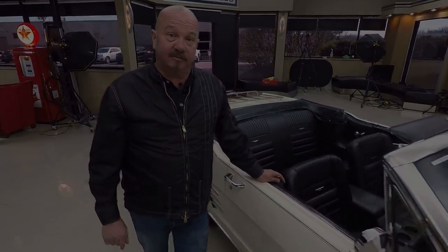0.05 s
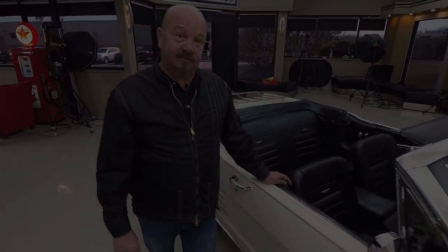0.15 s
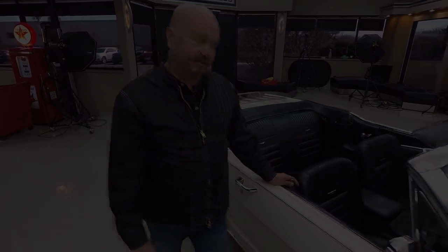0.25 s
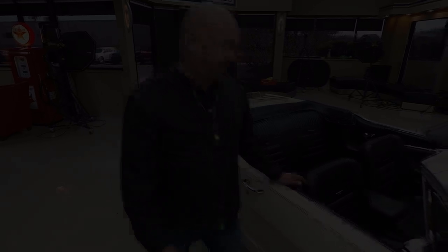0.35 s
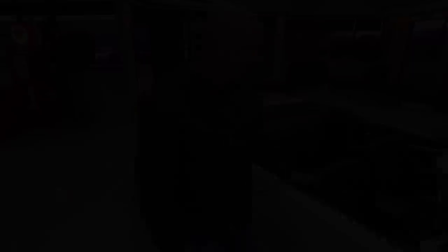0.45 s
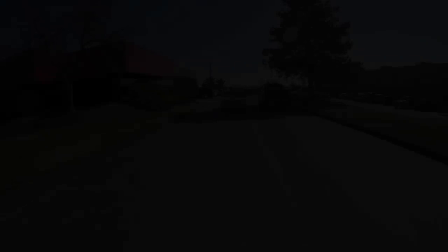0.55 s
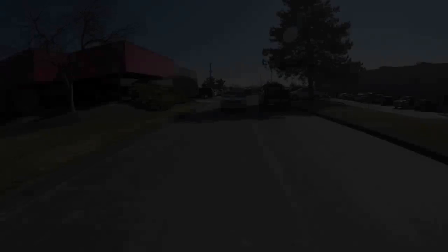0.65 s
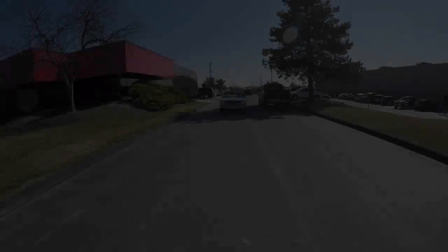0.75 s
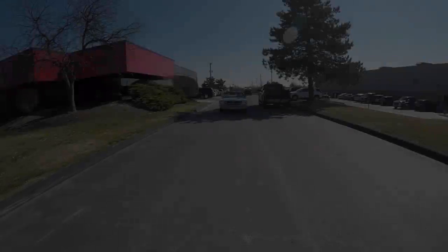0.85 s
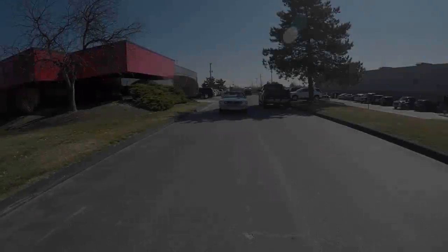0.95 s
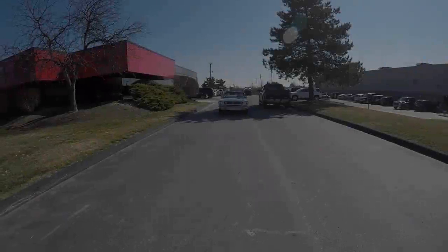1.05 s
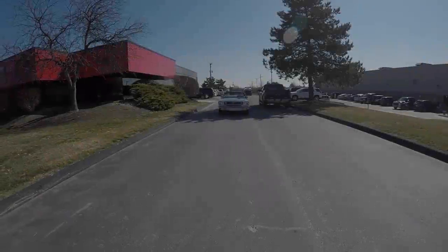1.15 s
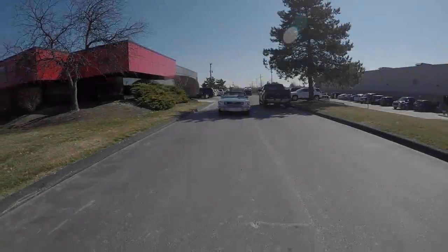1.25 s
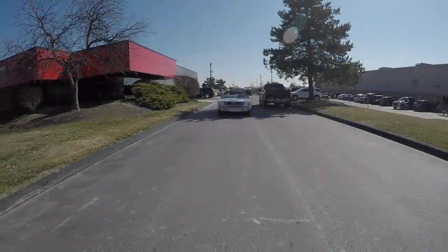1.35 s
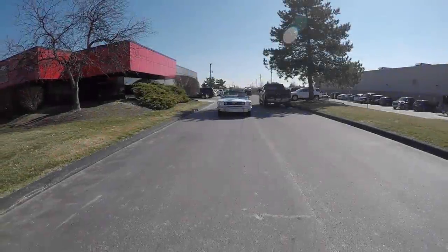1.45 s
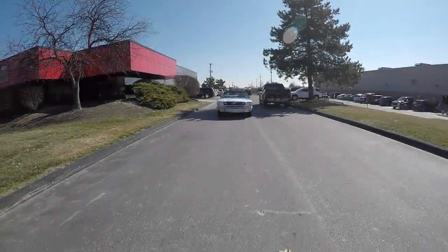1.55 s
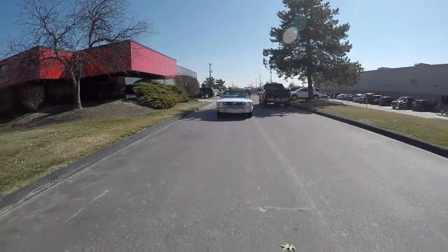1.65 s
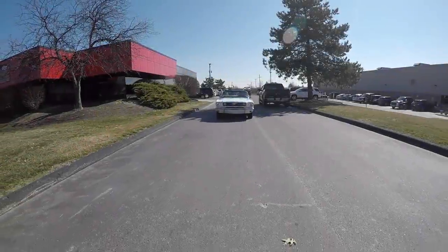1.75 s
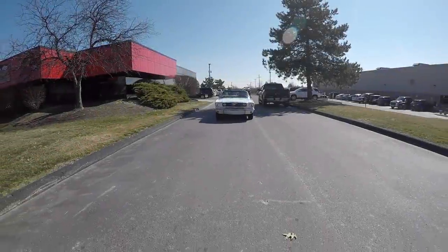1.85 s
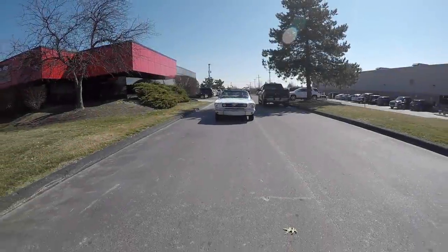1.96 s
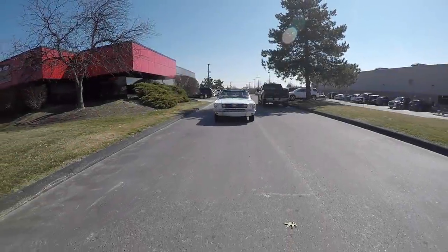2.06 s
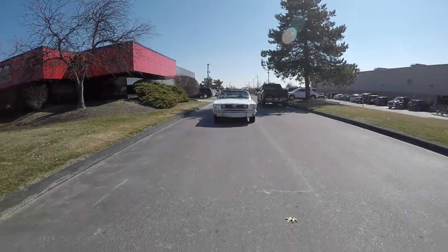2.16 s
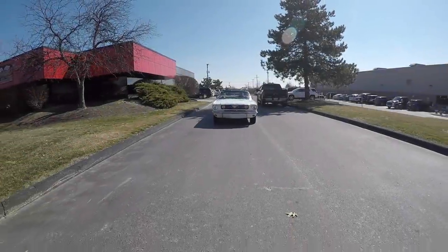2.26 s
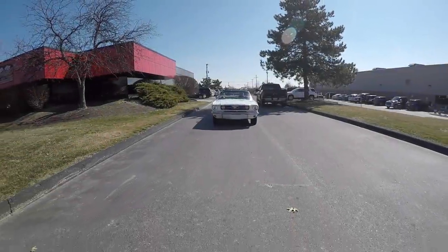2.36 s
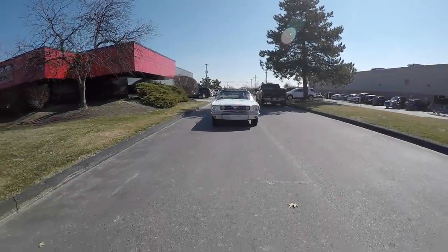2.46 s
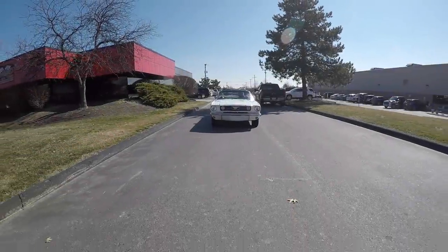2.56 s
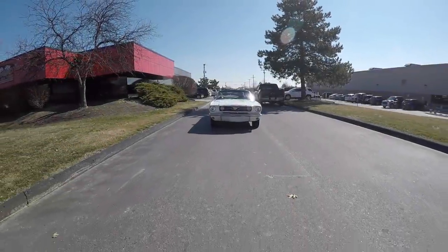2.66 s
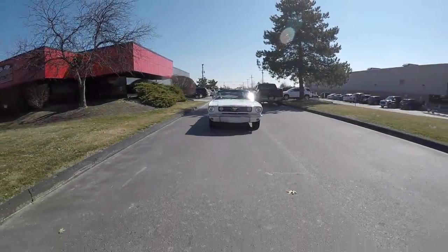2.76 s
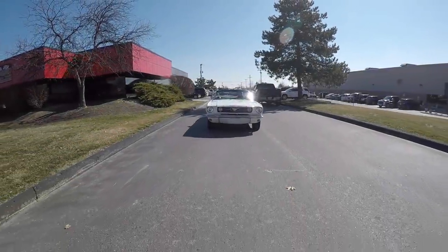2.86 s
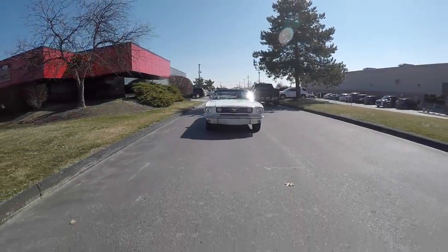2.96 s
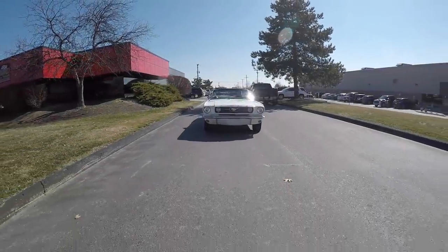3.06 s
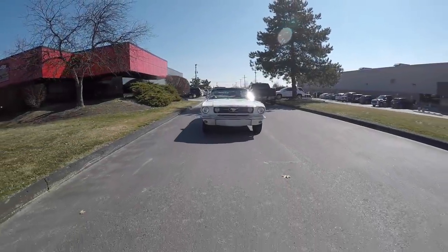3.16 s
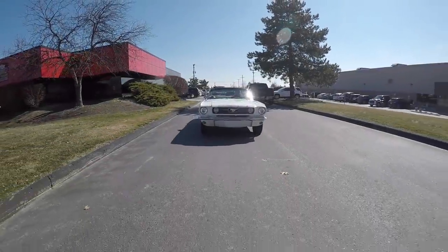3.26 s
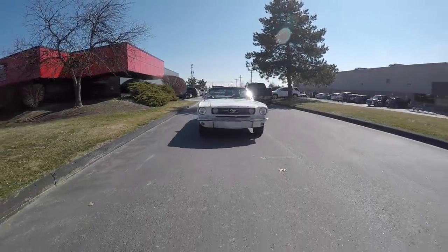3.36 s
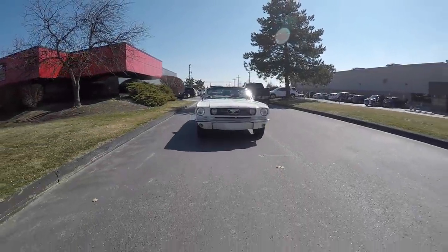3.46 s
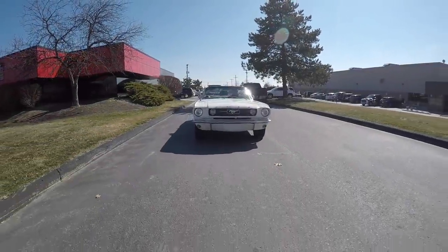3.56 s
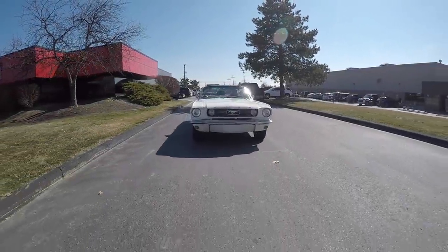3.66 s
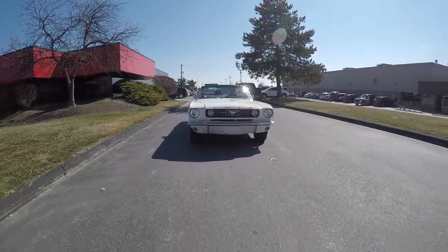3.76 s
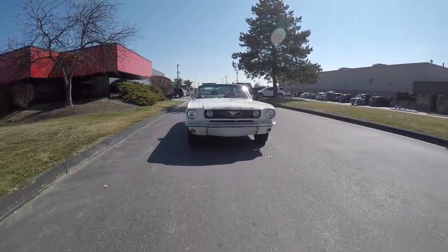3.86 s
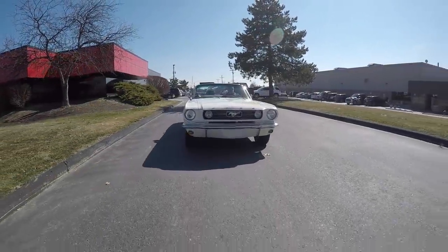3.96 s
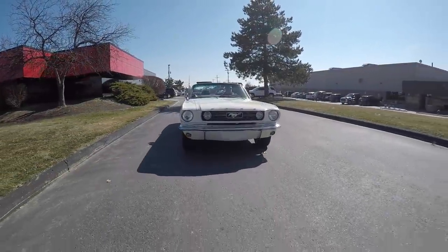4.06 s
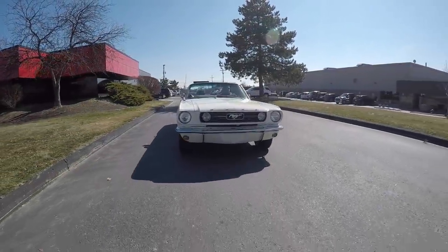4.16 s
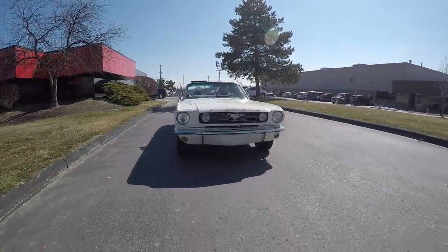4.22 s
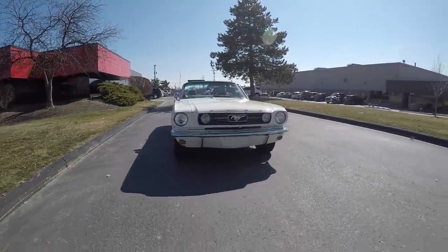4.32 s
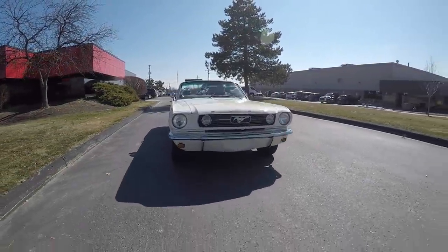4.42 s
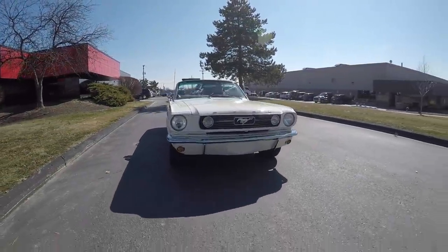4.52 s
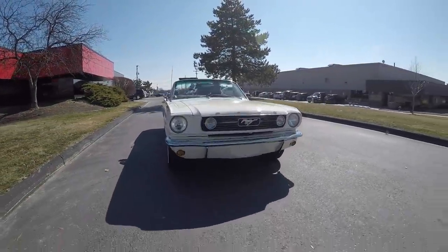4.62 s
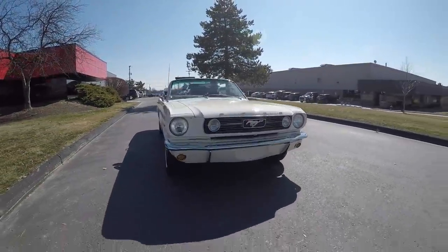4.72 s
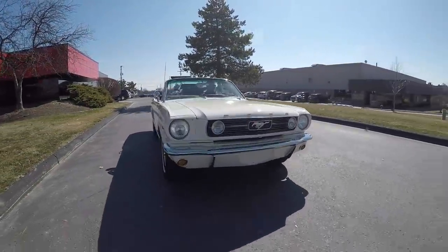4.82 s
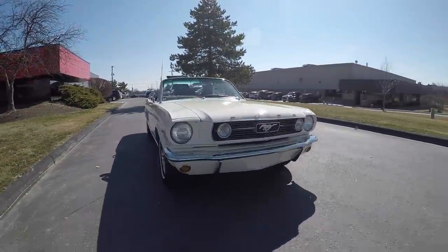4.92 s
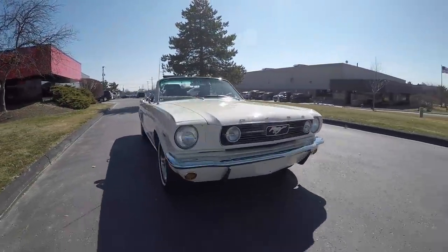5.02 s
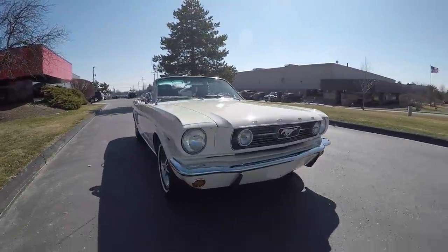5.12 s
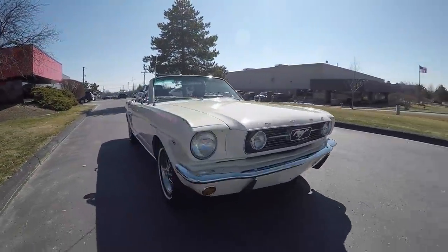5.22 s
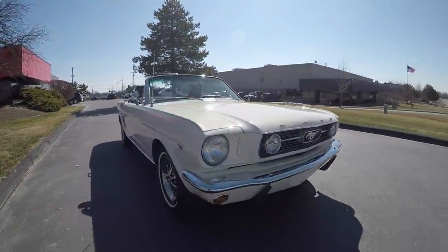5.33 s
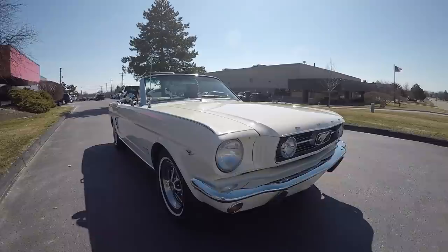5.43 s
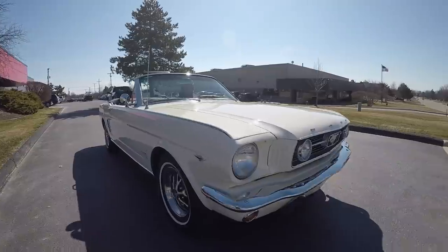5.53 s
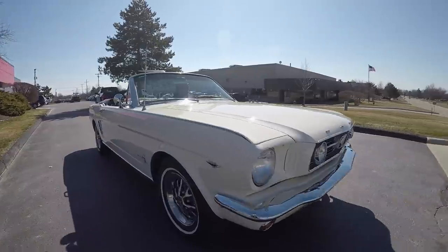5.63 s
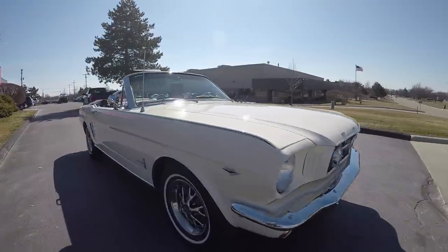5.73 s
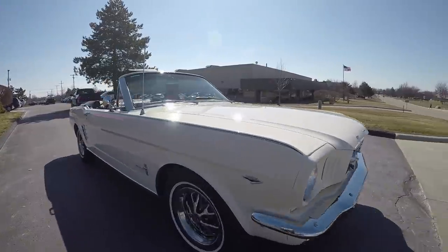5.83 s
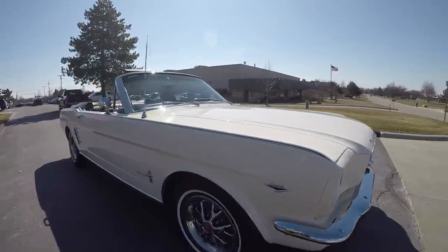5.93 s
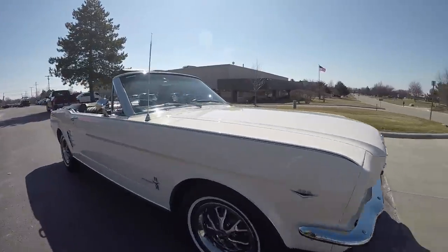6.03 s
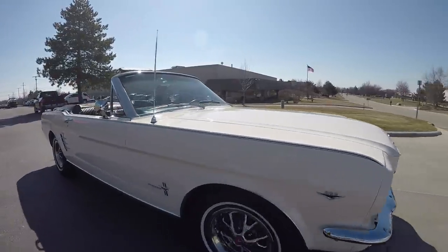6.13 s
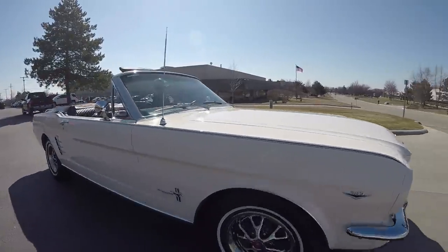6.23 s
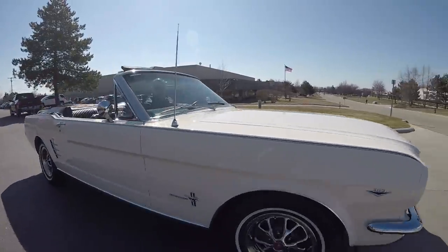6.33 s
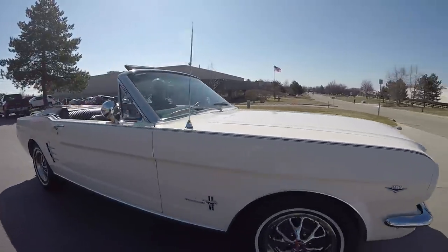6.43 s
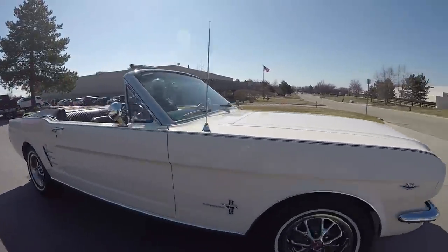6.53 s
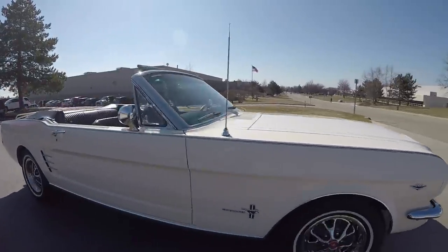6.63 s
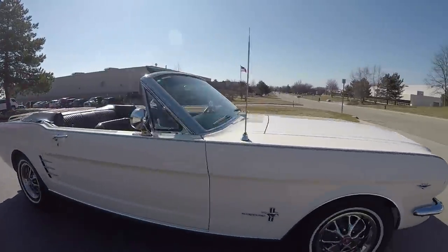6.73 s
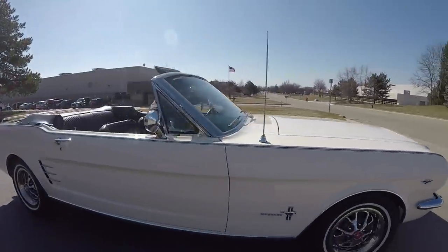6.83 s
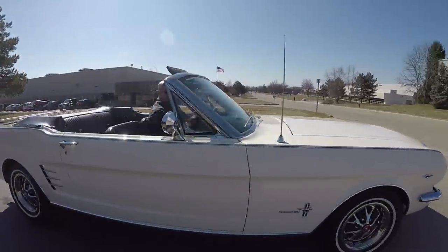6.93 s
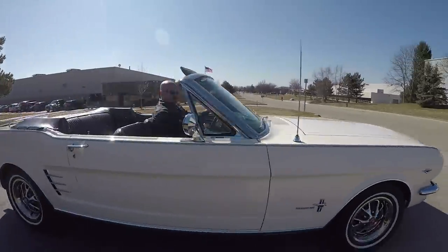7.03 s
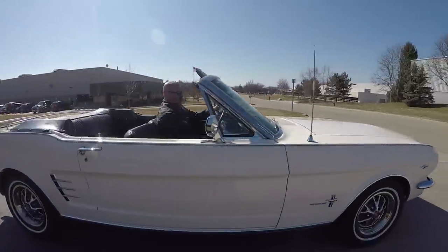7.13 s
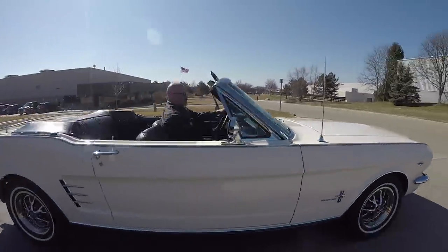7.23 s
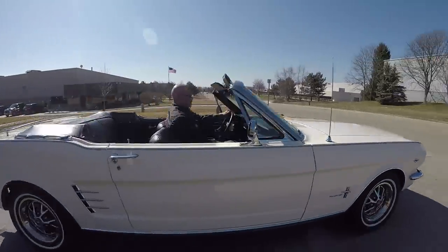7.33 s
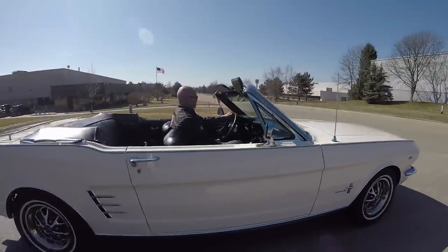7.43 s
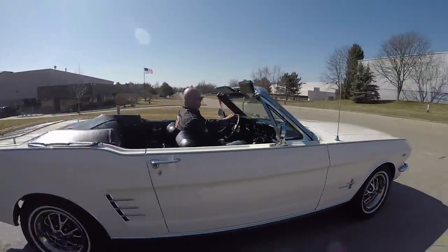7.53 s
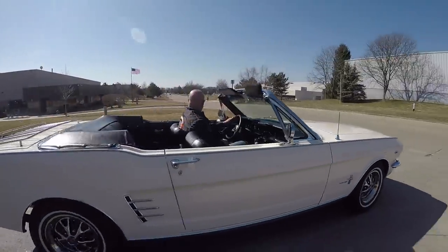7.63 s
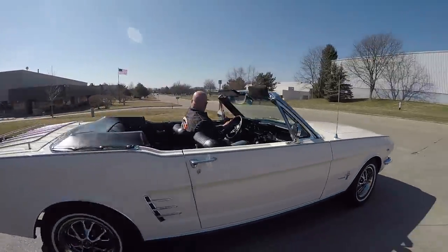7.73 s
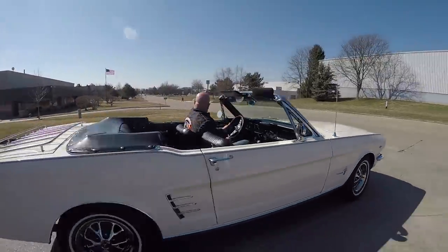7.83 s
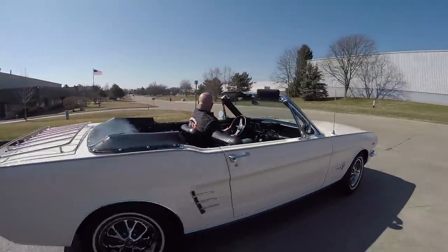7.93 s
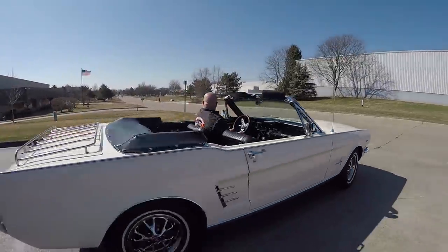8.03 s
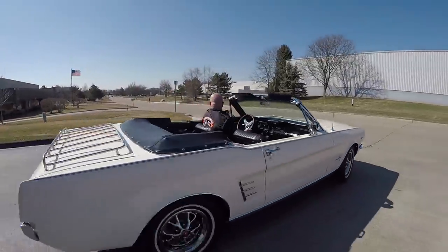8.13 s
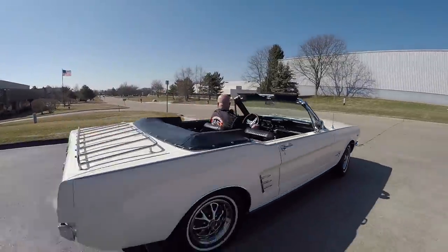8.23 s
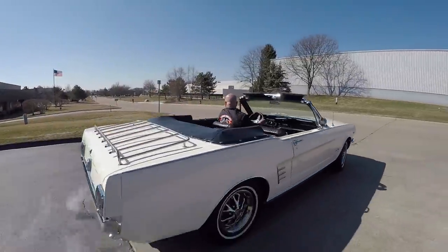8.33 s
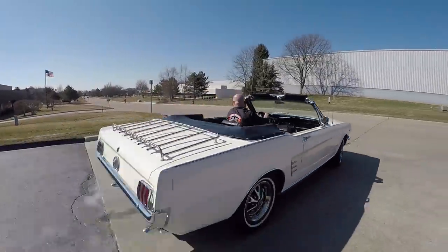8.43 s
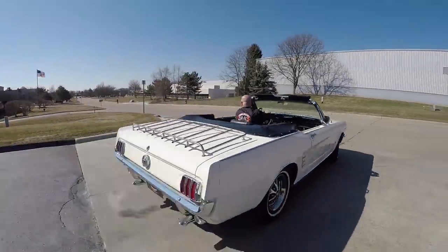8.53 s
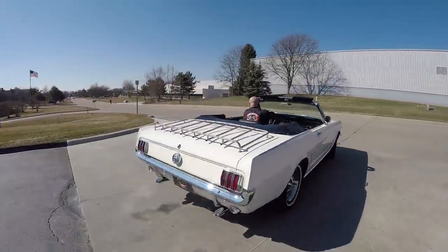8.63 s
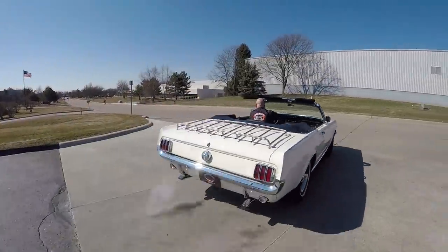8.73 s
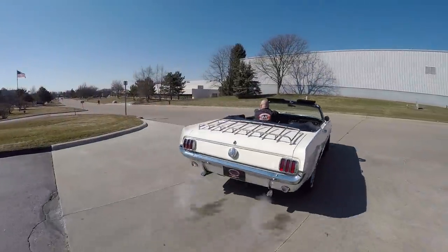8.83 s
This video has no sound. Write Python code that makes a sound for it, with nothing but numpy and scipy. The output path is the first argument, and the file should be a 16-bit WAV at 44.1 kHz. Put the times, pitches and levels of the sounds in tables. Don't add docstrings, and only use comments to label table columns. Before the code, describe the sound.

From 0 to 0.5 s there is very faint indoor room tone, a soft dull knock and tiny ticks, fading almost to silence. From about 0.6 s an outdoor road fades in, with low wind gusts thudding on the microphone, strongest before 1.5 s, and a faint traffic murmur. A distant V8 burble at steady, lumpy idle grows from 2 to 5 s. Sharp, irregular gas spits emerge after 3 s, with fan and tyre hiss and light panel buzzes. Grit pops at 5.3 and 6.35 s; tyres scrub softly near 6 s. The car is close and ticking brightly around 6-7.3 s. At 7.4-7.65 s a throttle blip surges with intake roar, rasp and whistles, then sinks below idle by 8 s as wind gusts. From 8.15 s it pulls away, revs rising in steps, booming and rasping, with hard exhaust cracks loudest at 8.7-8.9 s.

```python
import sys
import numpy as np
from scipy import signal
from scipy.fft import rfft, irfft, next_fast_len
from scipy.io import wavfile
from scipy.ndimage import uniform_filter1d

SR = 44100
rng = np.random.default_rng(int(sys.argv[2]) if len(sys.argv) > 2 else 0)


def volts_from_db(level):
    exponent = np.asarray(level, float) / 20
    return 10 ** exponent


def dump(signal):
    limited = np.clip(np.atleast_2d(signal).T, -1, 1)
    pcm = np.round(limited * 32767).astype(np.int16)
    wavfile.write(sys.argv[1], SR, pcm)


N = 391608
T = np.arange(N) / SR
STEP = 32
SLOW_T = T[::STEP]


def track(table, t=T):
    s, value = np.transpose(table)
    return np.interp(t, s, value)


def unit(x):
    return x / np.sqrt(np.mean(x ** 2))


def steady(x, window_s):
    return x / np.sqrt(uniform_filter1d(x ** 2, int(window_s * SR)) + 1e-12)


def fill(slow):
    return np.interp(T, np.arange(len(slow)) * STEP / SR, slow)


def walk(rate_hz):
    k = int(SR / STEP / rate_hz)
    held = np.repeat(rng.standard_normal(N // STEP // k + 2), k)
    return 2.0 * uniform_filter1d(uniform_filter1d(held, k), k)[:N // STEP + 1]


def noise(colour, flicker_db, rate_hz, per_octave=2):
    size = next_fast_len(N)
    octave = np.log2(np.arange(1, size // 2 + 2) * SR / size).astype(np.float32)
    hz, db = np.transpose(colour)
    gain = volts_from_db(np.interp(octave, np.log2(hz), db, left=-90, right=-90)).astype(np.float32)
    spectrum = rfft(rng.standard_normal(N, np.float32), size) * gain
    step = 1 / per_octave
    out = np.zeros(N)
    for centre in np.arange(np.log2(hz[0]), np.log2(hz[-1]) + step, step, dtype=np.float32):
        band = np.clip(1 - per_octave * abs(octave - centre), 0, 1)
        out += irfft(spectrum * band, size)[:N] * fill(volts_from_db(flicker_db * walk(rate_hz)))
    return unit(out)


def resonance(x, hz, width_hz):
    return signal.lfilter(*signal.iirpeak(hz, hz / width_hz, SR), x)


def ring(x, modes):
    return sum(volts_from_db(db) * resonance(resonance(x, hz, width), hz, width) for hz, width, db in modes)


def strokes(at, db, decay_s, lag_s=0):
    x = np.zeros(N)
    x[np.clip((at + lag_s * SR).astype(int), 0, N - 1)] = volts_from_db(db)
    return signal.lfilter([1], [1, -np.exp(-1 / (decay_s * SR))], x)


def whistles(at, chance, low_hz, high_hz, length_s):
    out, n = np.zeros(N + SR), int(3 * length_s * SR)
    swell = T[:n] / length_s * np.exp(-3 * T[:n] / length_s)
    wobble_rad = 1.56 * fill(walk(300))
    for i, (pitch, size) in zip(at[at < N - n], chance.T):
        hz = low_hz * (high_hz / low_hz) ** (.5 + .5 * np.tanh(.8 * pitch))
        out[i:i + n] += volts_from_db(2.5 * size) * swell * np.sin(2 * np.pi * hz * T[:n] + wobble_rad[i:i + n])
    return unit(out[:N])


def bursts(events):
    out = np.zeros(N)
    for s, length_s, hz, width_hz, db in events:
        i, n = int(s * SR), int(length_s * SR)
        open_db = 4.5 * (s > 7.35 and hz > 1500)
        burst = unit(ring(rng.standard_normal(n), [(hz, width_hz, 0)]))
        out[i:i + n] += volts_from_db(db + open_db) * np.sqrt(np.hanning(n)) * burst
    return out


# time_s, distance_m
DISTANCE = [(.55, 34), (.8, 48), (1.15, 55), (1.55, 21), (3.6, 9.5), (4.5, 5.26), (5.1, 4.3), (5.8, 4.4),
            (6.5, 2.95), (7.2, 2.88)]
# time_s, load_db above idle
LOAD = [(5.95, 0.5), (6.17, 4), (6.25, 0), (7.32, 0), (7.4, 9.5), (7.47, 16), (7.545, 17.5), (7.6, 13),
        (7.67, 1.5), (7.8, 0), (8.07, 0), (8.21, 2.5), (8.33, 8), (8.47, 10), (8.56, 12), (8.7, 13),
        (8.79, 14), (8.88, 13)]
# time_s, share_0_to_1
TAIL_NEAR = [
    (5.85, 0),
    (6.35, 0.45),
    (7.2, 0.14),
    (7.65, 1),
]
TAIL_TURNS_S = (7.97, 8.293)


def heard_db(at_1m_db, loss, per_load, level_db, turn_db):
    distance_db = -loss * 20 * np.log10(track(DISTANCE, SLOW_T))
    tail_db = level_db * track(TAIL_NEAR, SLOW_T) + turn_db * np.interp(SLOW_T, TAIL_TURNS_S, (0, 1))
    return fill(at_1m_db + distance_db + per_load * track(LOAD, SLOW_T) + tail_db)


# time_s, level_db
HALL = [(0.0, -62.5), (.23, -64), (.27, -69), (.45, -72), (0.56, -80)]
# freq_hz, level_db
HALL_AIR = [(24, -44), (40, -11), (76, -2), (145, -5), (196, -2), (478, -8), (554, -10), (1290, -12.5),
            (1530, -13.5), (4790, -24), (15000, -35)]


def hall():
    return volts_from_db(track(HALL)) * np.interp(T, (.5, .553), (1, 0)) * noise(HALL_AIR, 1.5, 20, per_octave=.5)


# start_s, level_db, pitch_hz
KNOCKS = [
    (.036, -48, 400),
    (.05, -56, 800),
    (0.185, -59, 1350),
    (.325, -58.5, 797),
    (5.301, -30, 1490),
    (5.299, -38, 3480),
    (5.304, -33, 800),
    (6.347, -31, 1100),
]


def knocks():
    out = np.zeros(N)
    for s, db, hz in KNOCKS:
        i = int(s * SR)
        click = rng.standard_normal(900) * np.exp(-T[:900] / .004)
        out[i:i + 900] += volts_from_db(db) * ring(click, [(hz, 2.1 * hz, 6)])
    return out


# freq_hz, level_db
ROAD = [(120, -42.5), (200, -0.5), (382, -18), (589, -8), (936, -4.5), (1160, -8), (2220, -11), (3270, -20),
        (8000, -26), (10400, -28), (17600, -120)]


def road():
    return volts_from_db(-58) * noise(ROAD, 0.44, 7.1, per_octave=.5)


# peak_s, level_db, fall_s per 10 dB
GUSTS = [(.645, -29, 0.01), (.74, -33.5, .04), (.86, -32, .5), (1.1, -35, 0.27), (1.26, -32.5, 0),
         (1.43, -40.5, 0.1), (1.89, -42, 0.2), (2.17, -43, .06), (2.29, -34.5, 0.1), (2.48, -36, 0.04),
         (2.61, -35.5, 0.3), (3.07, -40.5, 0.5), (3.3, -37, 1), (3.74, -33.5, 0.06), (3.86, -38, .13),
         (4.0, -38, 0.7), (4.74, -39.5, 0.46), (5.76, -42, 0.3), (6.13, -43, 0.3), (6.6, -45, 1),
         (7.17, -43, 0.3), (7.55, -31.5, .4), (7.89, -28.5, .17), (8.19, -26.5, 0.1), (8.33, -35, 0),
         (8.45, -34, .3), (8.67, -27, 0.14)]
# freq_hz, level_db
RUMBLE = [(6, -15), (12, 3.5), (22, -1), (40, -1), (70, -11), (120, -17.5), (250, -39.5)]
# freq_hz, level_db
BUFFET = [(60, -13), (120, -4.5), (250, -6), (500, -13), (900, -31), (2000, -71)]


def wind():
    rise_s, lull_db, shelter_db = 0.068, -51.5, -8
    power = volts_from_db(2 * lull_db)
    for s, db, fall_s in GUSTS:
        power = power + volts_from_db(2 * db - 20 * np.maximum((s - SLOW_T) / rise_s, (SLOW_T - s) / fall_s))
    gust_db = fill(10 * np.log10(power))
    buffet_db = -61 + 1.1 * (gust_db + 40) + shelter_db * track(TAIL_NEAR)
    rumble = steady(noise(RUMBLE, 3.15, 13), .2)
    return volts_from_db(gust_db + 1.46) * rumble + volts_from_db(buffet_db) * noise(BUFFET, 1.6, 10)


# start_s, length_s, pitch_hz, width_hz, level_db
SCRUBS = [
    (5.133, 0.1, 1080, 200, -48),
    (5.199, 0.17, 1200, 200, -52),
    (5.976, 0.115, 1096, 200, -42.5),
    (5.99, 0.1, 3500, 4000, -42.5),
    (6.09, .14, 4300, 4000, -46),
    (6.088, 0.2, 1180, 200, -50.5),
    (7.678, 0.16, 704, 503, -46),
    (8.018, 0.075, 1199, 59.6, -45.5),
]


def scrubs():
    return bursts(SCRUBS)


# start_s, length_s, pitch_hz,
# width_hz, level_db
MORE_BURSTS = [(4.92, .04, 2200, 250, -56), (5.0, .06, 4900, 300, -53), (5.09, .05, 4900, 250, -55),
               (5.17, .025, 2700, 1500, -50), (5.46, .15, 3500, 120, -53), (5.5, .1, 5000, 200, -55),
               (5.55, .035, 5500, 150, -53), (5.55, .03, 2150, 200, -54), (5.61, .03, 2200, 200, -53),
               (5.64, .06, 3750, 300, -51), (7.59, .14, 850, 450, -42), (7.72, .05, 8250, 300, -50),
               (7.815, .07, 8250, 300, -50), (7.855, .07, 11800, 3500, -43), (7.955, .03, 4300, 300, -49),
               (6.02, .03, 4300, 200, -47), (6.02, .035, 5100, 200, -48), (6.11, .02, 3850, 200, -47),
               (6.15, .055, 5100, 250, -48), (6.2, .045, 3300, 250, -50), (6.255, .025, 4200, 200, -48),
               (8.2, .05, 6000, 900, -50), (8.21, .035, 5000, 200, -45), (8.29, .03, 4400, 200, -41),
               (8.33, .03, 5000, 250, -42), (8.34, .045, 1850, 150, -39), (8.47, .025, 3800, 200, -39),
               (.02, .05, 800, 300, -70), (.12, .09, 1300, 300, -72)]


def more_bursts():
    return bursts(MORE_BURSTS)


# freq_hz, level_db
FAN = [(180, 8), (300, -6.5), (502, -9.5), (915, -5.5), (1930, -7), (2480, -6), (3130, -8.5), (4670, -7),
       (7320, -14), (11300, -14), (16000, -39)]
# pitch_hz, width_hz, level_db
TINS = [(1440, 74, -10), (2165, 290, -5.5), (3510, 105, -1.5), (4980, 250, -5), (6400, 440, -10),
        (8330, 330, -5)]


def fan():
    rattle = sum(ring(rng.standard_normal(N), [tin]) * fill(volts_from_db(2.6 * walk(30))) for tin in TINS)
    hiss = unit(noise(FAN, 1.2, 14) + volts_from_db(-10.5) * unit(rattle))
    return volts_from_db(heard_db(at_1m_db=-33, loss=1.0247, per_load=0.67, level_db=1.6, turn_db=0.3)) * hiss


# time_s, firing_rate_hz
IDLE = [(0, 59.16), (1.7, 59.13), (2.45, 57.51), (3.15, 60.49), (4.45, 59.56), (5.2, 57.52), (5.9, 58.62),
        (6.4, 58.12), (7.3, 59.42)]
# time_s, firing_rate_hz
BLIP = [
    (7.3, 59.4),
    (7.4, 65.57),
    (7.5, 84.5),
    (7.58, 91),
    (7.7, 77.12),
    (7.85, 62),
    (8.0, 54.84),
]
# time_s, firing_rate_hz
PULL = [(8.1, 55.2), (8.152, 58.2), (8.258, 70.5), (8.328, 78.5), (8.404, 78.5), (8.545, 78.8), (8.6, 80),
        (8.68, 87.5), (8.74, 100), (8.8, 105.2), (8.88, 110.7)]
BANK = [1, 0, 1, 0, 0, 1, 0, 1]


def crank():
    firings = 10.01 + np.cumsum(track(IDLE[:-1] + BLIP + PULL)) / SR
    at = np.flatnonzero(np.diff(np.floor(firings)))
    return firings, at, np.floor(firings[at + 1]).astype(int)


LEAK_DB = [1, -8, 14.5, -1, -27, 13, -5, 10, 1, -4, -6, 9, -12, 13.5, -6, 9.5]
# start_s, level_db
SPITS = [(3.1201, -46.5), (3.1709, -47), (3.2732, -45), (3.3051, -44), (3.3879, -40), (3.6528, -44),
         (3.7731, -40.5), (3.9202, -40), (3.9716, -42), (4.0689, -39), (4.1866, -34), (4.2405, -42),
         (4.3393, -42), (4.3717, -41), (4.4565, -36), (4.5054, -37), (4.674, -39), (4.7244, -34.5),
         (4.7774, -37), (4.8117, -33), (4.8965, -34), (5.0003, -34), (5.1026, -36), (5.1539, -38),
         (5.1914, -39), (5.2742, -36), (5.3275, -35.5), (5.4692, -34), (5.558, -38), (5.6069, -38),
         (5.7102, -36), (5.8294, -34), (5.8803, -34), (5.9147, -35), (6.017, -30), (6.1003, -31),
         (6.1517, -29), (6.1866, -33), (6.2559, -41), (6.2894, -28), (6.3767, -26), (6.4265, -32),
         (6.5323, -40), (6.5662, -31), (6.651, -27), (6.7024, -30), (6.7403, -29), (6.8087, -27),
         (6.9229, -28), (6.9753, -38), (7.0771, -39), (7.109, -32), (7.1928, -30), (7.2302, -30),
         (7.327, -29)]
# freq_hz, level_db
LEAK = [(2500, -41), (4000, -4.5), (7000, 1.5), (9000, 0.5), (11500, 4), (13500, 3), (16000, -6)]


def leak(at, number, chance):
    s, spit_db = np.transpose(SPITS)
    puff_db = np.take(LEAK_DB, number % 16) + 2.2 * chance[2]
    usual = strokes(at, puff_db, decay_s=0.022)
    sealing = np.interp(T[at], (7.36, 7.42, 7.62, 7.7), (1, .3, .3, 1))
    under_spits_db = -3 * ((T[at] > s[0]) & (T[at] < s[-1]))
    puffs = strokes(at, sealing * puff_db + 5 * (1 - sealing) + under_spits_db, decay_s=0.022)
    puffs = puffs / np.sqrt(np.mean(usual ** 2))
    spits = strokes((s * SR).astype(int), spit_db - 15.5, decay_s=0.031)
    hidden = np.interp(T, (8.1, 8.4), (1, .2))
    leak_db = heard_db(at_1m_db=-32.5, loss=1.3, per_load=0.9031, level_db=-2.5, turn_db=5)
    flow = uniform_filter1d(hidden * volts_from_db(leak_db) * puffs + spits, size=190)
    squeal = .3 * whistles(at, chance[4:6], 9000, 13500, length_s=.012)
    return flow * unit(noise(LEAK, 1.0, 27) + squeal)


# start_s, length_s, pitch_hz, width_hz, level_db
JETS = [(6.30, .04, 5200, 200, -48), (6.345, .025, 6600, 250, -45), (6.385, .04, 3500, 150, -50),
        (6.655, 0.039, 3550, 150, -44), (6.71, .04, 3570, 150, -47), (6.98, 0.032, 3320, 300, -46),
        (7.075, .06, 5100, 150, -48), (7.11, 0.037, 2150, 200, -48), (7.19, .025, 6700, 250, -46),
        (7.245, .025, 6340, 300, -45.5), (7.28, .03, 3610, 200, -46), (7.4, .03, 4160, 500, -37),
        (7.4, .025, 6700, 250, -40), (7.42, 0.2, 2560, 90, -41), (7.455, .03, 5900, 200, -38),
        (7.47, .12, 6250, 250, -38), (7.49, 0.093, 985, 50, -38.5), (7.53, 0.031, 3650, 200, -36),
        (7.535, .03, 4700, 300, -36), (8.25, 0.044, 4960, 150, -38), (8.309, .03, 1890, 150.2, -38),
        (8.36, 0.027, 5400, 250, -36), (8.456, .03, 5580, 600, -33), (8.49, 0.031, 3600, 199.9, -36.5),
        (8.501, .03, 6300, 500, -32), (8.57, 0.031, 5900, 600, -33), (8.585, .025, 5150, 200, -33.5),
        (8.63, .015, 2880, 400, -39), (8.665, .025, 6410, 300, -36), (8.72, .025, 3660, 200, -33.5),
        (8.765, .02, 7640, 600, -30), (8.768, .02, 2600, 300, -34), (8.805, .018, 8300, 400, -33),
        (8.843, .025, 8300, 600, -31)]


def jets():
    return bursts(JETS)


# freq_hz, level_db
INTAKE = [(180, -13), (300, 5), (343, 3), (418, -21), (494, -11), (725, -9), (978, -25), (1320, -42),
          (1560, -9), (3030, -14.5), (6200, -7), (11900, -12.5), (16000, -22)]
# freq_hz, level_db
RASP = [(300, -2.5), (555, -3), (800, -10), (1000, -22), (1300, -27), (1520, -12), (1750, 4), (2000, 4),
        (2450, -1), (2750, -20), (3150, -20), (3550, 3), (3900, -4), (4400, -3), (5700, 1.5), (8000, -6),
        (13500, -14), (16000, -28)]


def throttle(at, number, chance):
    beat_db = 6.2 * np.take(BANK, number % 8) + 3.5 * chance[3]
    beat = unit(strokes(at, beat_db, decay_s=0.0099, lag_s=0.0019))
    duct = ring(rng.standard_normal(N), [(2520, 72, 0), (3690, 100, -1), (4250, 160, -7), (6250, 160, -3)])
    intake = (0.39 + 0.24 * beat) * (noise(INTAKE, 2.5, 25) + volts_from_db(-8) * unit(duct))
    squeal = .3 * whistles(at, chance[6:8], 3300, 8500, length_s=.012)
    squeal = squeal + .22 * whistles(at, chance[8:10], 1600, 2600, length_s=.015)
    rasp = (.55 + .45 * beat) * (noise(RASP, 1.5, 40) + squeal)
    thumps = -strokes(at, 0.9 * chance[1], decay_s=0.0026, lag_s=0.0039)
    boom = steady(ring(thumps, [(84.7, 36, 0)]), 0.16)
    intake_db = heard_db(at_1m_db=-49, loss=0.94, per_load=2, level_db=-1.5, turn_db=2.5)
    rasp_db = heard_db(at_1m_db=-66, loss=0, per_load=0.3138, level_db=16, turn_db=18.5)
    boom_db = heard_db(at_1m_db=-66, loss=0, per_load=0.55, level_db=14, turn_db=15.5)
    return volts_from_db(intake_db) * intake + volts_from_db(rasp_db) * rasp + volts_from_db(boom_db) * boom


# peak_s, peak_db
BARKS = [(7.4465, -26), (7.479, -21), (7.4965, -22), (7.509, -21), (7.5405, -20), (7.5485, -22),
         (7.5655, -23), (7.576, -22), (7.583, -22), (7.612, -24), (7.6275, -24), (8.283, -26),
         (8.3107, -25), (8.3587, -23), (8.4604, -21), (8.489, -26), (8.5635, -21), (8.6275, -25),
         (8.6719, -24), (8.7198, -21), (8.7286, -18), (8.7474, -14), (8.7597, -21), (8.7783, -14),
         (8.7893, -17), (8.8253, -11), (8.8541, -17), (8.8635, -17)]
# pitch_hz, width_hz, level_db
BARK_RING = [(105, 30, 4), (240, 120, -7), (560, 90, -1), (790, 120, -6), (1010, 120, -6)]


def barks():
    width_s, low_hz = .0009, 90
    pulses = -sum(volts_from_db(db) * np.exp(-((T - s) / width_s) ** 2) for s, db in BARKS)
    direct = signal.lfilter(*signal.butter(1, low_hz, btype="high", fs=SR), pulses)
    return direct + ring(pulses, BARK_RING)


# cycle_multiple, polarity, far_db, alongside_db, under_load_db
HUM = [(8, -1, -12, -22, -40), (11, -1, -40, -40, -8), (19, 1, -18, -14, -40), (29, 1, -26, -19, -40),
       (33, 1, -28, -22, -40), (46, 1, -36, -28, -40)]


def hum(firings):
    cycle_rad, out = 2 * np.pi * firings / len(BANK), 0
    for order, polarity, far_db, near_db, load_db in HUM:
        db = np.interp(SLOW_T, (2.5, 5.5, 7.3, 7.4, 8.15, 8.3, 8.68, 8.76),
                       (far_db, near_db, near_db, -40, -40, load_db, load_db, -40))
        level = fill(volts_from_db(db + 2.6 * walk(6.5)))
        out = out + polarity * level * np.sin(order * cycle_rad + order ** 2)
    return out


def pipe_notes(blows, modes):
    load_db = track(LOAD, SLOW_T)
    return sum(fill(volts_from_db(per_load * load_db)) * ring(blows, [mode]) for *mode, per_load in modes)


CYLINDER_DB = [-3, 0, -2, -3, 4, -2.5, -6, 4]
# pitch_hz, width_hz, level_db, db_per_db_load
PIPE = [
    (62, 33, -7, 0),
    (113.4, 30, 2, -.1),
    (140.2, 15.3, -2.5, -0.08),
]
# pitch_hz, width_hz, level_db, db_per_db_load
OVERTONES = [(213.9, 11.7, -7, 0), (245.3, 33, -8, -.2), (278, 20, -16, .3), (337.8, 20, -12, 0.05),
             (400, 24, -24, 0.37), (448.6, 23, -16.5, .3), (558, 24, -13.5, 0.21), (980, 40, -28, 0.7)]


def exhaust(at, number, chance):
    far = 1 - np.take(BANK, number % 8)
    far_db = heard_db(at_1m_db=-8.5, loss=0, per_load=-0.47, level_db=8, turn_db=2)
    lumpy = np.interp(T[at], (8.05, 8.2), (1, .3))
    firing_db = lumpy * (np.take(CYLINDER_DB, number % 8) + 1.3 * chance[0]) + far_db[at] * far
    lag_s = 0.00309 + 0.0017 * far + .00008 * chance[1]
    blows = -strokes(at, firing_db, decay_s=0.0016, lag_s=lag_s)
    low_db = heard_db(at_1m_db=-8, loss=-.6, per_load=0.1, level_db=3, turn_db=-2)
    overtone_db = heard_db(at_1m_db=0.2, loss=0, per_load=0.13, level_db=3.5, turn_db=-2)
    pipes = volts_from_db(low_db) * pipe_notes(blows, PIPE[:1]) + pipe_notes(blows, PIPE[1:])
    pipes = pipes + volts_from_db(overtone_db) * pipe_notes(blows, OVERTONES)
    rings = np.isin(number % 16, (3, 4)) & (T[at] > 4.4) & (T[at] < 8.1)
    chuffs = strokes(at[rings], 3 * chance[1, rings], decay_s=0.00035, lag_s=lag_s[rings])
    return steady(pipes, 0.56) + volts_from_db(-26) * unit(ring(chuffs, [(340, 20, 0)]))


def tailpipes(firings, at, number, chance):
    off_tune = (np.gradient(firings) * SR - PIPE[1][0]) / 30
    in_tune_db = 4 * np.interp(T, TAIL_TURNS_S, (0, 1)) * np.exp(-off_tune ** 2)
    lope_db = 1.3 * np.interp(T, (3.0, 5.0, 7.3, 7.4), (2.4, 1.1, 1.05, 0))
    lope_db = lope_db * np.cos(2 * np.pi * (firings - 1.8) / len(BANK))
    base_db = heard_db(at_1m_db=-33.5, loss=0.72, per_load=.5, level_db=8.5, turn_db=-1.5)
    level = volts_from_db(base_db + in_tune_db + lope_db + fill(walk(5)))
    return level * (exhaust(at, number, chance) + hum(firings))


def scene():
    firings, at, number = crank()
    chance = rng.standard_normal((10, len(at)))
    outdoors = road() + wind() + fan() + leak(at, number, chance) + throttle(at, number, chance)
    outdoors = outdoors + barks() + tailpipes(firings, at, number, chance)
    small = knocks() + scrubs() + more_bursts() + jets()
    return (hall() + small + np.interp(T, (0.55, 0.94), (0, 1)) * outdoors)[None]


def top_cut(x):
    return signal.sosfilt(signal.butter(12, 15720, fs=SR, output="sos"), x)


def record(dry):
    low_pass = signal.ellip(10, .2, 80, 15720, fs=SR, output="sos")
    mix = signal.sosfilt(low_pass, dry)
    return top_cut(mix)


dry = scene()
out = record(dry)
dump(out)
```